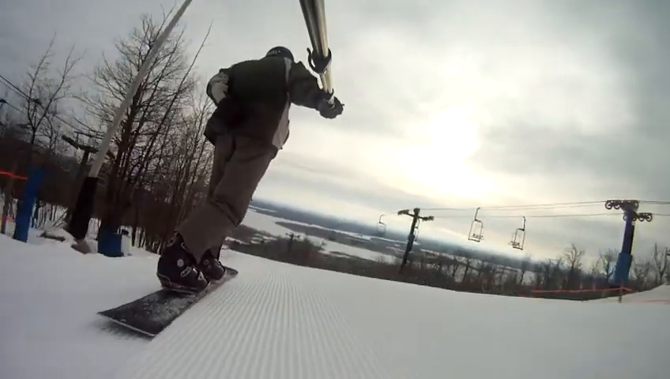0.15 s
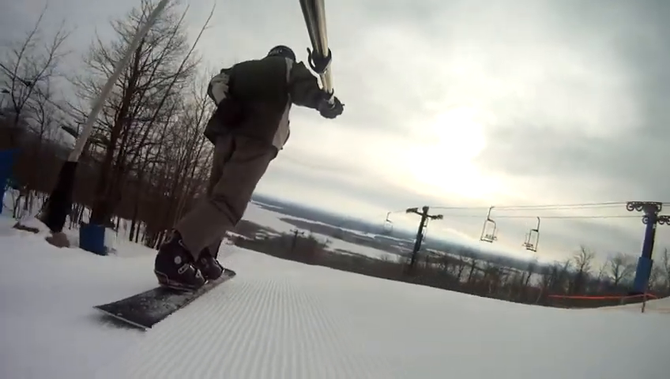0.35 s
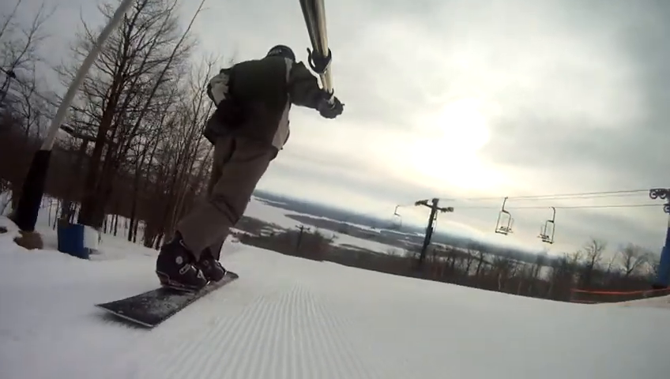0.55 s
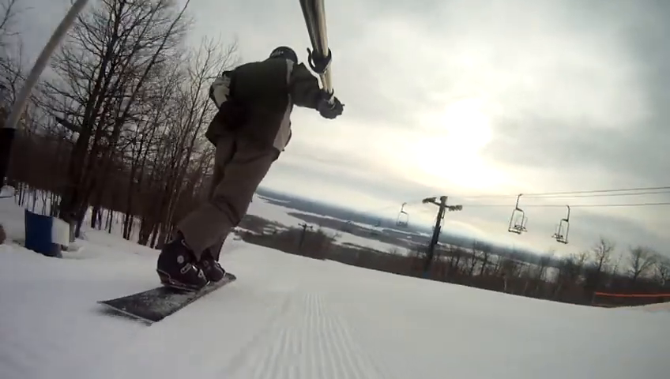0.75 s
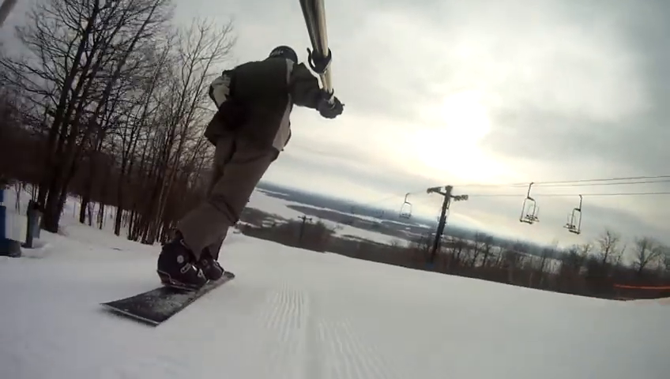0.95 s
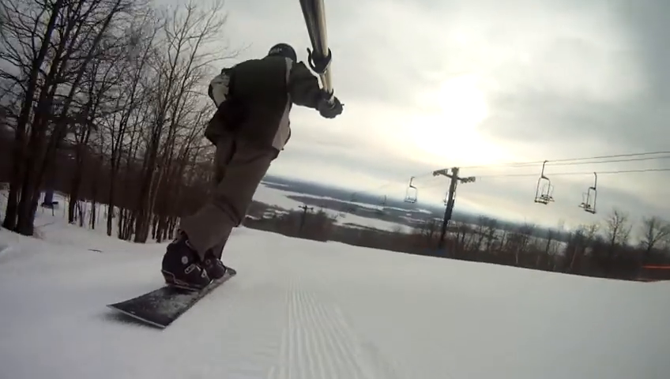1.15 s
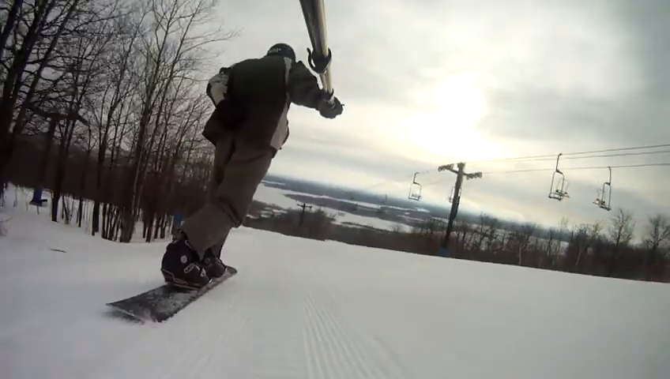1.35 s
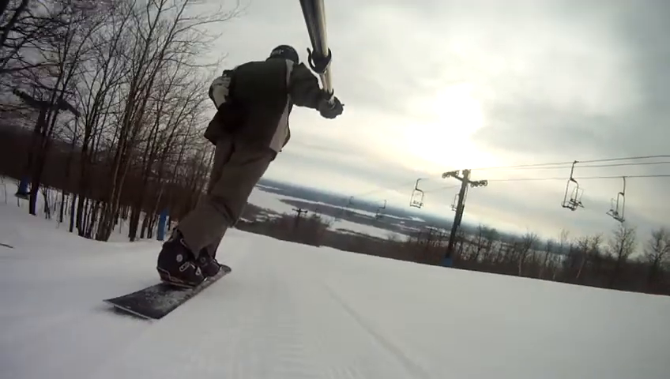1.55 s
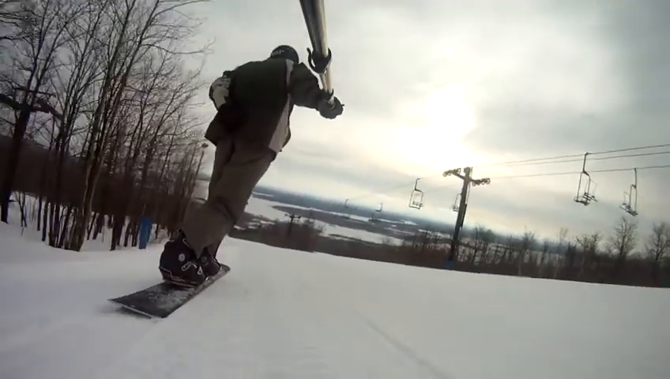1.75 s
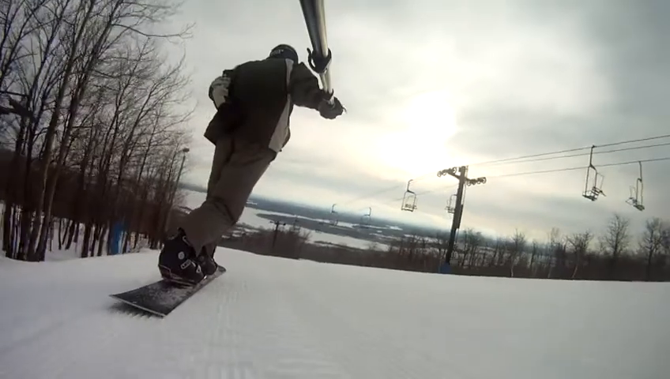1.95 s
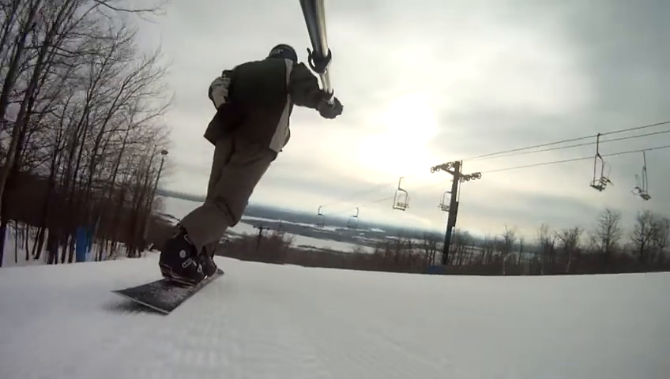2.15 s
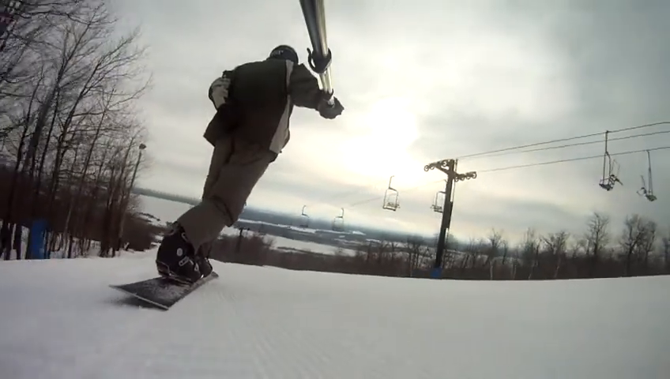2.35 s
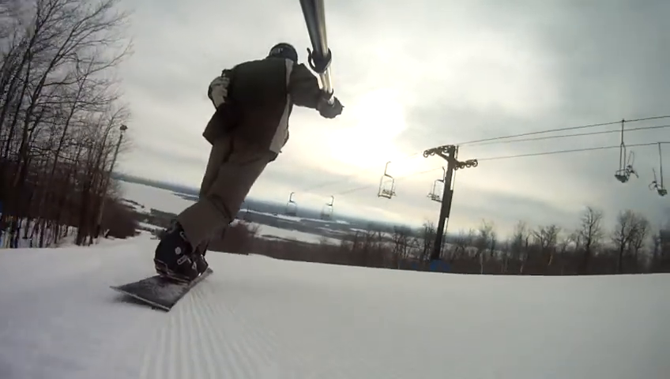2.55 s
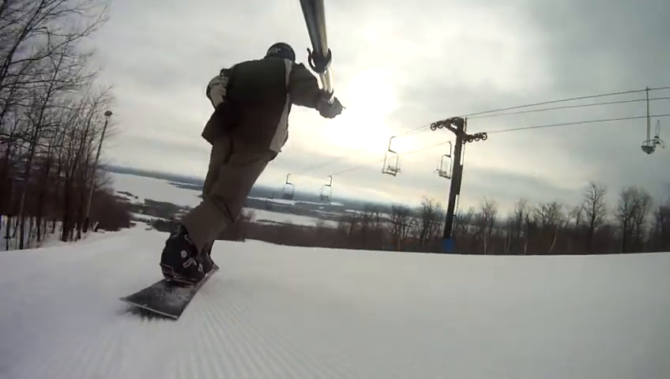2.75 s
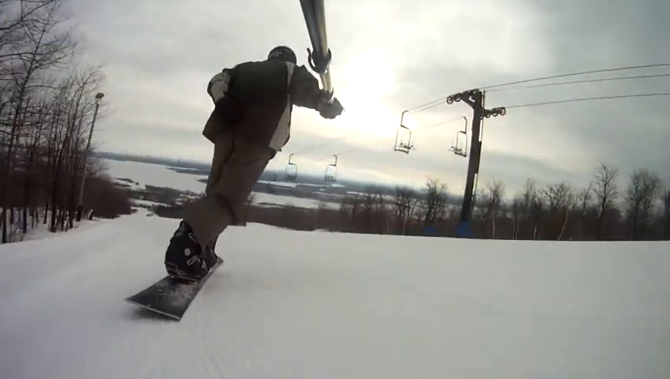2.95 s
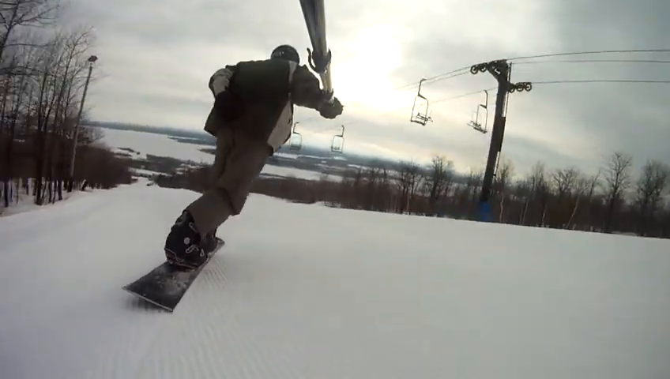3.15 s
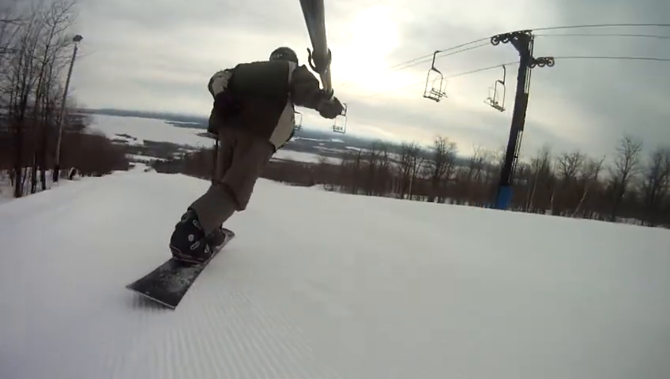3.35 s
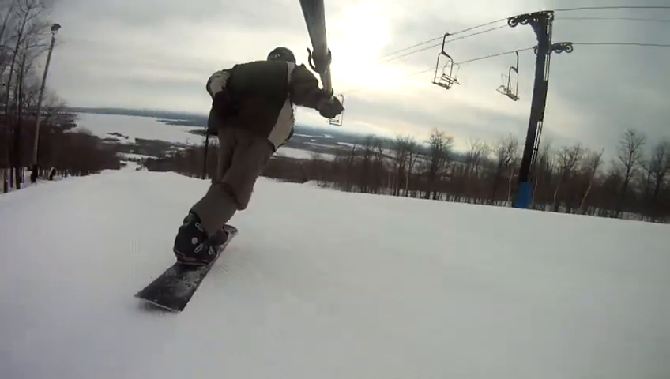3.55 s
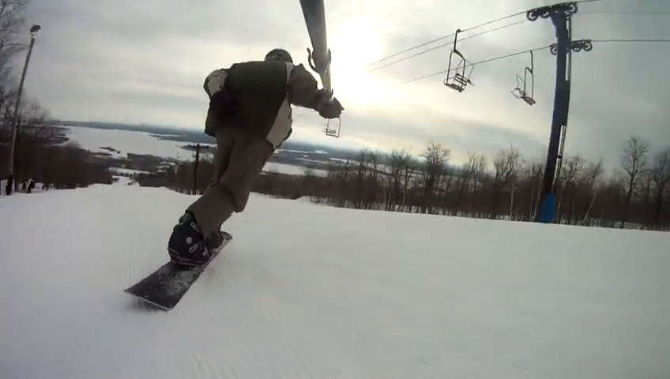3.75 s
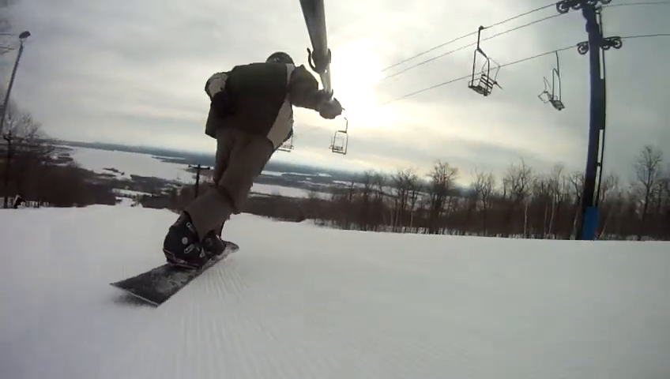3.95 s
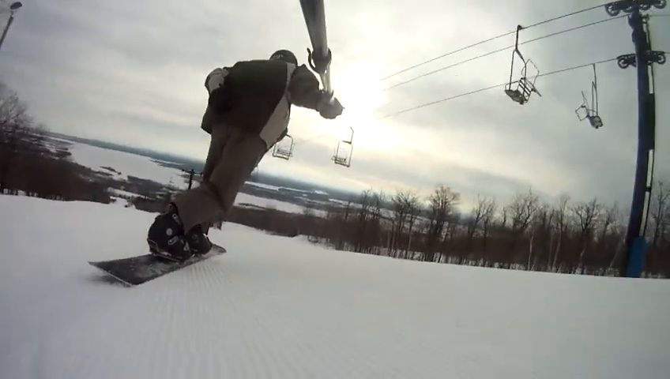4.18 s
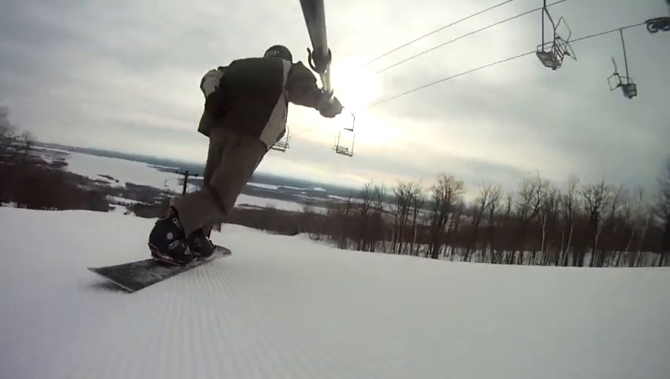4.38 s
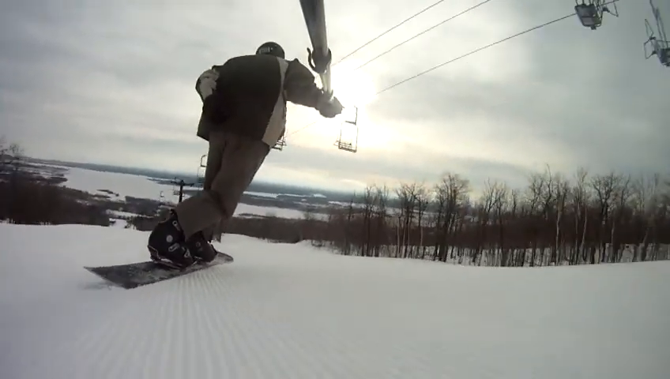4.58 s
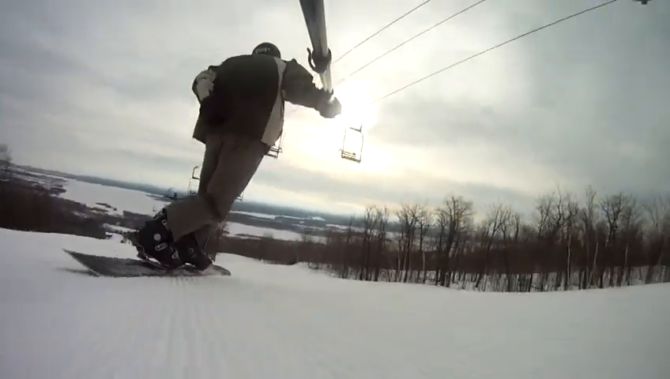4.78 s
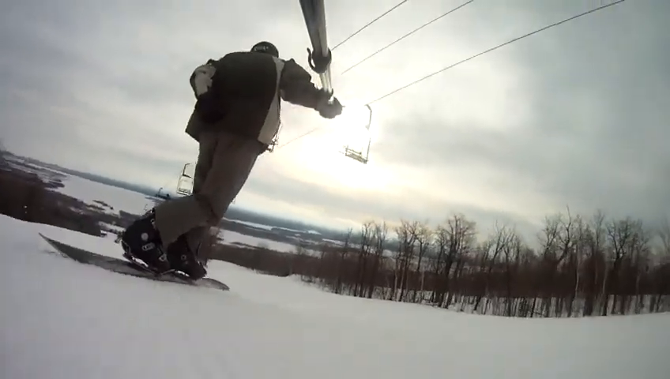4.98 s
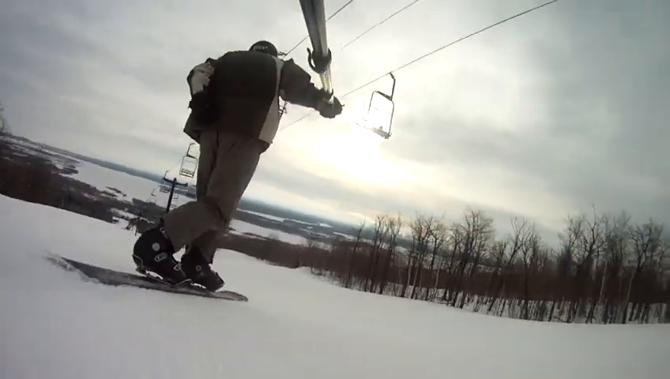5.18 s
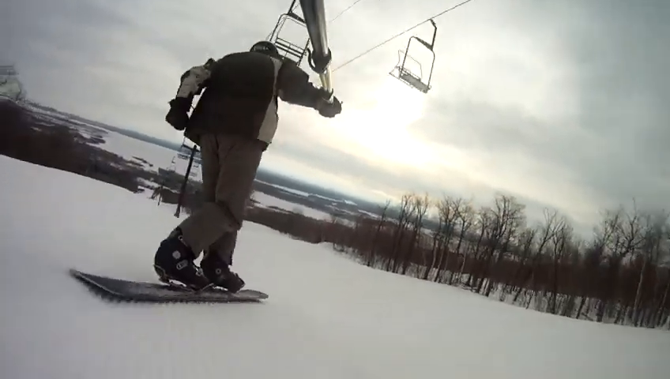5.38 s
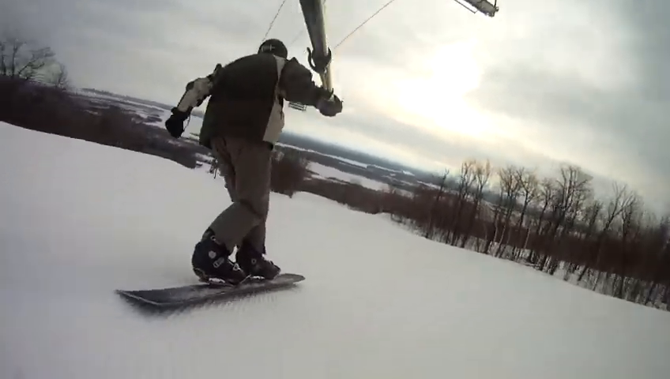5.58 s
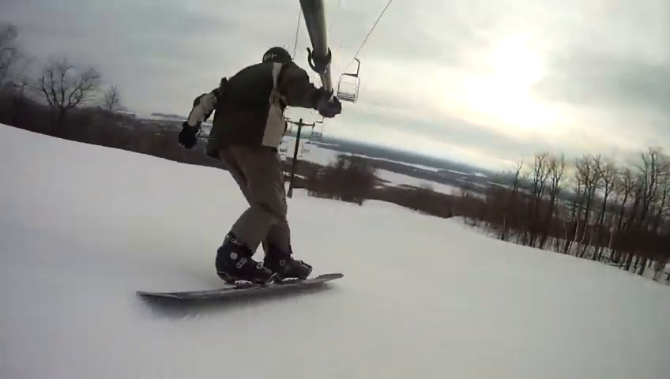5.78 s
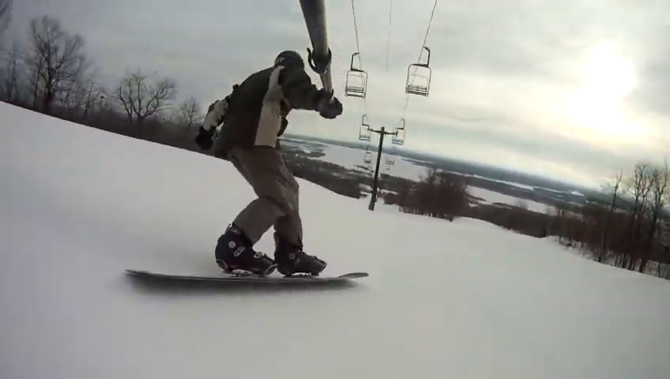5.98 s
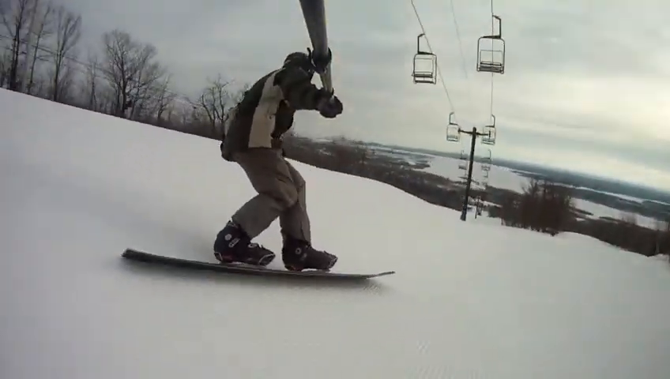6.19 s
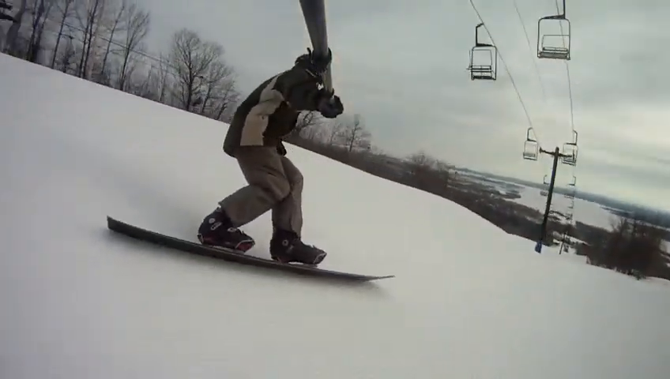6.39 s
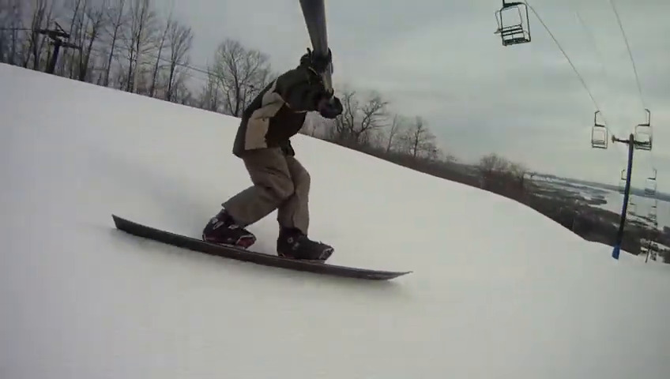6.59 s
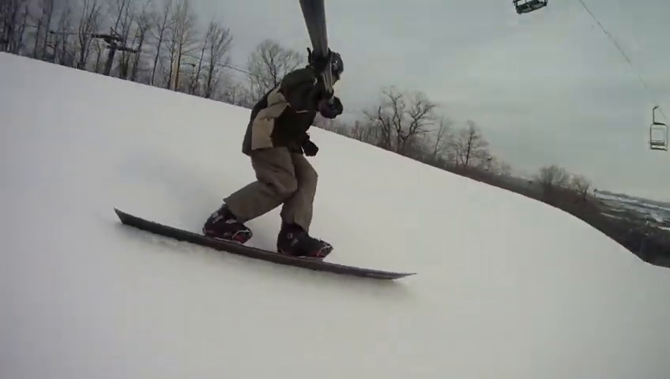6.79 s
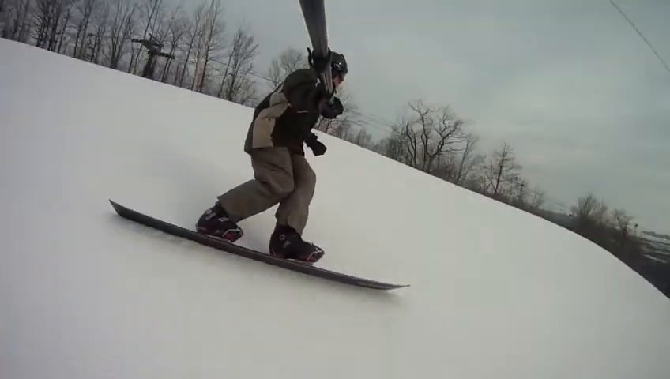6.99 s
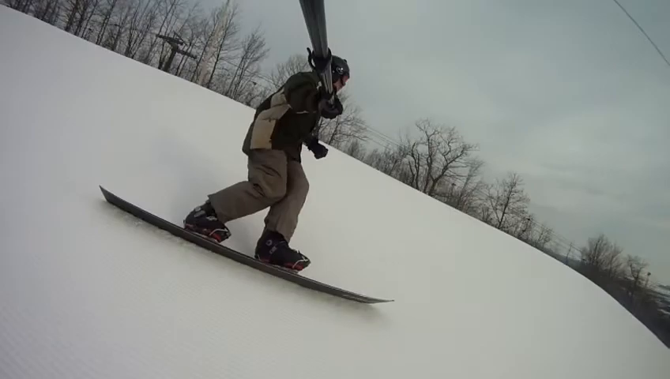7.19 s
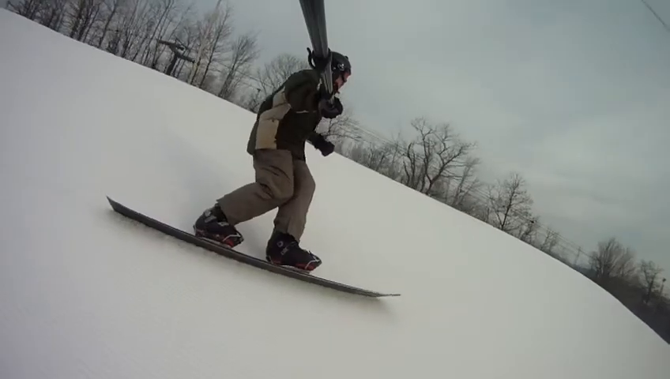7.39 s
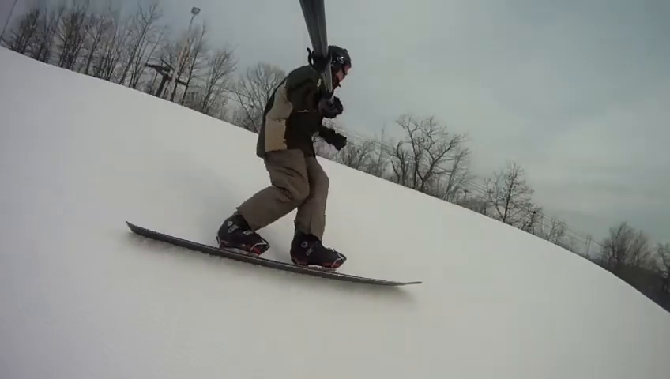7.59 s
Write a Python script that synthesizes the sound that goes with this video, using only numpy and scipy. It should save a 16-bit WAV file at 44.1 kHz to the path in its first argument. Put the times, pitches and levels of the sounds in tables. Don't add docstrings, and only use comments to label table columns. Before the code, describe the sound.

Close, boxy, slightly distorted sound of a snowboard ride. Hissing snow and light wind rumble build into a loud, fluttering roar with boomy gusts and blunt pops that make the level dip. The edge grates unevenly through packed snow, throwing fine grainy spray. The turn eases briefly into a flatter hiss, then a coarse, choppy carve finishes the ride and stops abruptly, with no open-air echo.

```python
import sys
import numpy as np
from scipy import signal
from scipy.fft import rfft, irfft, next_fast_len
from scipy.io import wavfile
from scipy.ndimage import uniform_filter1d

SR = 44100
rng = np.random.default_rng(int(sys.argv[2]) if len(sys.argv) > 2 else 0)


def rack_gain(trim_db):
    fader = np.asarray(trim_db, float)
    return 10 ** (fader / 20)


def digitize_waveform(pressure):
    field = np.atleast_2d(pressure).T
    bounded = np.clip(field, -1, 1)
    quanta = np.round(bounded * 32767).astype(np.int16)
    wavfile.write(sys.argv[1], SR, quanta)


N = 336483

EDGE_CHANGE_S, EDGE_CHANGE_MS = 5.86, 840
BOOMY_S, BOOMY_MS = 3.57, 600


def rms_one(x):
    return x / np.sqrt(np.mean(x ** 2) + 1e-20)


def in_time(rows):
    s, *columns = np.transpose(rows)
    return [np.interp(np.arange(N) / SR, s, c) for c in columns]


def swells(rows):
    t = np.arange(0, N, 20) / SR
    total_db = np.zeros(len(t))
    for s, db, length_ms in rows:
        u = (t - s) / (length_ms / 1000)
        total_db += db * np.exp(-4 * np.log(2) * u ** 2)
    return np.interp(np.arange(N) / SR, t, total_db)


def coloured(x, spectrum):
    size = next_fast_len(N)
    hz, level_db = np.transpose(spectrum)
    grid = np.maximum(np.arange(size // 2 + 1) * SR / size, 1)
    gain = rack_gain(np.interp(np.log(grid), np.log(hz), level_db))
    return rms_one(irfft(rfft(x, size) * gain, size)[:N])


def drift(rate_hz):
    r = np.exp(-40 * np.pi * rate_hz / SR)
    noise = rng.standard_normal(N // 20 + 2002)
    slow = signal.lfilter([1], [1, -2 * r, r * r], noise)[2000:]
    return np.interp(np.arange(N) / 20, np.arange(len(slow)), rms_one(slow))


def evened(x, window_s):
    window = int(window_s * SR)
    power = uniform_filter1d(uniform_filter1d(x ** 2, window), window)
    return rms_one(x / (power + .05) ** 0.31)


def resonance(x, hz, width_hz):
    r = np.exp(-np.pi * width_hz / SR)
    poles = [1, -2 * r * np.cos(2 * np.pi * hz / SR), r * r]
    return signal.lfilter(np.array([1, 0, -1]) * (1 - r * r) / 2, poles, x)


def crystals(per_s, spread_db):
    sizes = rack_gain(spread_db * np.minimum(rng.exponential(1, N), 5)) * rng.choice([-1, 1], N)
    return sizes * (rng.random(N) < per_s / SR)


# (frequency [Hz], density [dB])
BASE_SPECTRUM = [(900, -19), (1500, -3.5), (2000, 0.5), (2500, 0), (3200, -32), (4300, -17), (4800, -3),
                 (5500, -18)]
# (time [s], swell [dB], length [ms])
SWISHES = [
    (0.0, 4, 120),
    (.45, 4, 100),
]
# (time [s], swell or lull [dB], length [ms])
BUMPS = [(0.404, 2.6, 46), (0.768, 5.5, 59), (1.152, -2.5, 190), (1.482, 4, 49), (2.609, 0.5, 40),
         (2.789, -5.5, 58), (3.028, -4.5, 74), (3.198, -5, 40), (3.372, -3.5, 35), (3.612, 2.7, 26),
         (3.841, 3, 36), (3.981, 1.5, 40), (4.141, -5.5, 87), (4.25, -3.0, 72), (4.864, 3.5, 82),
         (5.049, -3, 33), (5.393, 2.5, 52), (5.787, -5, 47), (5.946, -4.5, 50), (6.071, -3.5, 54),
         (6.346, -3.5, 67), (6.505, -8, 23), (6.605, -4, 85), (6.785, -4, 54), (7.024, 4.5, 52),
         (7.149, -4, 53), (7.313, -1.5, 59), (7.378, 1.5, 23), (7.488, 2.5, 59), (7.618, -5.5, 51)]


def glide():
    t = np.arange(N) / SR
    turn_s, fade_db_per_s, sag_db_per_s = 2.4, 30, 0.2
    straight_db = -54 - sag_db_per_s * t + swells(SWISHES)
    straight_db = straight_db - fade_db_per_s * np.clip(t - turn_s, 0, 2)
    flat = rack_gain(-41.5 + swells(BUMPS)) * swells([(EDGE_CHANGE_S, 1, EDGE_CHANGE_MS)])
    hiss = coloured(crystals(per_s=6300, spread_db=2.0), BASE_SPECTRUM)
    return hiss * (rack_gain(straight_db) + flat) * rack_gain(1.1 * drift(25))


# (frequency [Hz], density [dB])
SPRAY_SPECTRUM = [(1500, -27), (2400, -4), (3400, -8.5), (4200, -3.5), (4800, -5), (5400, -6.5), (6000, -9)]
# (time [s], swell or lull [dB], length [ms])
PLUMES = [(.04, 9, 50), (.39, 4, 40), (.94, 7, 40), (1.42, -5, 40), (2.47, 5, 60), (2.95, -3, 120),
          (3.6, 1, 60), (3.89, -5, 40), (4.07, 3, 50), (4.94, -3, 70), (5.23, 3.5, 53), (5.72, 3.5, 55),
          (6.2, 0.5, 330), (6.55, 8, 35), (6.72, 2, 60), (7.47, -1, 80)]


def spray(chatter_db, speed_db, bite_db):
    spray_db = -38 + 1.07 * speed_db + 0.048 * bite_db + 1.23 * swells(BUMPS) + swells(PLUMES)
    heel_s, heel_drop_db, return_s = 6.485, 18, 0.64
    after_s = np.arange(N) / SR - heel_s
    spray_db = spray_db - heel_drop_db * (after_s > 0) * np.exp(-np.abs(after_s) / return_s)
    grains = crystals(per_s=6000, spread_db=2.0) * rack_gain(1.14 * chatter_db)
    return coloured(grains, SPRAY_SPECTRUM) * rack_gain(spray_db)


# (frequency [Hz], density [dB])
SCRAPE_SPECTRUM = [(350, -32), (650, -4), (1000, -7), (1500, -12.5), (2200, -15.5), (3200, -28),
                   (3900, -28.5), (4500, -41)]
# (frequency [Hz], width [Hz], level [dB])
CAVITY = (431, 254, 3.9)
# (time [s], extra bite [dB], length [ms])
DIGS = [(6.545, 6, 23), (6.71, 3, 88), (6.87, 4.5, 46), (6.95, 2.5, 90), (7.03, 1.5, 67), (7.1, 4.5, 30),
        (7.2, 5.5, 19), (7.27, -1, 60), (7.38, 3, 30), (7.44, 0, 30), (7.51, 2, 44), (7.585, 3.5, 21)]


def scrape(chatter_db, speed_db, bite_db):
    scrape_db = -33.9 + speed_db + bite_db + swells(DIGS) + 0.88 * swells(BUMPS)
    grit = crystals(per_s=5000, spread_db=1.5) * rack_gain(chatter_db)
    hz, width_hz, cavity_db = CAVITY
    ring = rms_one(resonance(resonance(grit, hz, width_hz), hz, width_hz))
    return (coloured(grit, SCRAPE_SPECTRUM) + rack_gain(cavity_db) * ring) * rack_gain(scrape_db)


# (time [s], wind on the case [dB], speed over the snow [dB], bite of the edge [dB])
RIDE = [(0, -22, -17.5, -0.5), (.15, -15, -16, 0), (.9, -14, -18, 2), (1.4, -11, -14.5, 2.5),
        (1.9, -6.5, -12.5, 0.5), (2.35, -9.5, -16.5, 4.5), (2.58, -7, -12, 3.5), (2.67, 0, -6, 3),
        (3.1, 1, -1.5, 0), (3.7, 0.5, -.5, 0), (4.2, -1.1, -1.5, 3), (4.9, -2, -4, 1.5),
        (5.7, -1.7, -.5, 0.9), (5.9, -2.5, -1, -2), (6.4, 0, -3.5, 3), (6.7, -8.5, -3, 9),
        (7.1, -2.5, -3, 8), (7.63, 2, -2, 7)]
# (frequency [Hz], width [Hz], level [dB])
PORT = (3696, 300, 1.9)


def edge(eddies_db):
    wind_db, speed_db, bite_db = in_time(RIDE)
    chatter_db = 0.43 * drift(61) + 0.65 * eddies_db
    snow = scrape(chatter_db, speed_db, bite_db) + spray(chatter_db, speed_db, bite_db)
    hz, width_hz, port_db = PORT
    faces_board = np.arange(N) / SR > 6.2
    return snow + rack_gain(port_db + 3 * faces_board) * resonance(snow, hz, width_hz)


# (frequency [Hz], width [Hz], level [dB])
SEAMS = [(1265, 170, 3), (2776, 295, 6), (2983, 310, 2.5)]


def whistle(eddies_db, speed_db, bite_db):
    whistle_db = -36.74 + 1.1 * speed_db - 0.11 * bite_db
    whistle_db = whistle_db + 0.82 * swells(BUMPS) + swells([(EDGE_CHANGE_S, -1.5, EDGE_CHANGE_MS)])
    air = rng.standard_normal(N) * rack_gain(1.05 * eddies_db + 0.24 * drift(75))
    tones = np.zeros(N)
    for hz, width_hz, seam_db in SEAMS:
        pole_hz = 1.54 * width_hz
        tones += rack_gain(seam_db) * resonance(resonance(air, hz, pole_hz), hz, pole_hz)
    return rms_one(tones) * rack_gain(whistle_db)


# (frequency [Hz], density [dB])
BOOM_SPECTRUM = [(70, -17), (130, 1), (200, -2.5), (320, -3.5), (480, -6), (600, -14), (750, -27),
                 (1200, -43.5)]
# (time [s], swell or lull [dB], length [ms])
GUSTS = [(0.11, -4, 67), (0.504, -3.2, 40), (0.639, -3.4, 37), (0.918, -4.5, 118), (1.586, -7, 52),
         (1.686, -3.5, 82), (1.921, -3.5, 65), (2.195, -2, 50), (2.31, -5.5, 67), (2.629, -4.5, 40),
         (2.819, -5.5, 37), (2.973, -6, 22), (3.387, -2, 32), (3.527, 3.5, 46), (4.141, -7, 44),
         (4.375, 7, 17), (4.899, 6, 46), (5.049, -7, 24), (5.183, -2, 30), (5.393, 3.5, 48),
         (6.036, -4.5, 16), (6.231, -14, 23), (6.38, -6, 59), (6.71, 7, 64), (6.894, 2.5, 59),
         (7.333, -3.9, 59), (7.543, -7, 27), (7.618, -16, 44)]


def boom(eddies_db, wind_db, speed_db, bite_db):
    turns = [(EDGE_CHANGE_S, -3, 500.), (BOOMY_S, 1.5, BOOMY_MS)]
    boom_db = -18.59 + 0.49 * wind_db + 0.44 * speed_db + 0.43 * bite_db + swells(GUSTS + turns)
    boom_db = boom_db + 0.54 * eddies_db + 1.0 * drift(26)
    return evened(coloured(rng.standard_normal(N), BOOM_SPECTRUM), window_s=0.04) * rack_gain(boom_db)


# (frequency [Hz], density [dB])
BUFFET_SPECTRUM = [(12, -30), (28, 3), (45, 1), (90, 2.5), (140, -5.5), (220, -8), (400, -49.5)]
# (time [s], swell or lull [dB], length [ms])
SHOVES = [(0.07, -9, 46), (0.17, -9, 29), (0.668, -7.5, 32), (0.808, 6.5, 41), (1.013, -7.6, 44),
          (1.088, 4.5, 23), (1.227, -6, 59), (1.512, -7, 66), (1.786, 2.5, 49), (1.946, -9, 34),
          (2.18, -8.3, 35), (2.948, 0, 45), (3.018, -15, 63), (3.317, -11, 40), (3.467, -10, 47),
          (4.185, -4, 34), (4.689, -5, 40), (4.899, 4, 27), (5.348, -2, 36), (5.552, -13, 40),
          (5.737, 7, 43), (5.792, -3, 30), (5.976, -1, 20), (6.121, -9, 35), (6.435, -6.1, 32),
          (6.735, 11, 44), (7.069, -5, 40), (7.353, -3.5, 40)]


def buffet(wind_db):
    turns = [(EDGE_CHANGE_S, 1.5, EDGE_CHANGE_MS), (BOOMY_S, -2.5, BOOMY_MS)]
    buffet_db = -16.5 + wind_db + swells(SHOVES + turns) + 1.2 * drift(19)
    return evened(coloured(rng.standard_normal(N), BUFFET_SPECTRUM), window_s=0.1) * rack_gain(buffet_db)


def wind(eddies_db, free):
    wind_db, speed_db, bite_db = in_time(RIDE)
    lows = buffet(wind_db) + boom(eddies_db, wind_db, speed_db, bite_db)
    return lows * free + whistle(eddies_db, speed_db, bite_db)


# (time [s], signed height [full scale], width [ms], gain duck [dB])
SLAPS = [(0.822, 0.25, 4.3, 0.3), (1.083, -0.19, 2.4, 0.3), (1.365, -0.19, 2.3, 0.3),
         (1.808, -0.35, 2.2, 0.3), (2.143, 0.29, 2.1, 0.3), (2.419, 0.27, 2.7, 0.3), (2.871, 0.5, 2.8, 3.1),
         (2.944, 0.62, 2.9, 3.3), (3.271, 0.55, 1.6, 3.5), (3.523, 0.6, 1.8, 5.4), (3.85, 0.6, 2.3, 1.6),
         (3.995, 0.54, 1.4, 3.3), (4.063, -0.68, 1.3, 1.3), (4.378, 0.82, 1.9, 2.9),
         (4.487, 0.54, 2.1, 2.8), (4.645, -0.68, 1.6, 1.0), (4.898, -0.6, 2.7, 7.4),
         (5.025, -0.48, 3.9, 2.0), (5.158, 0.46, 4.7, 2.0), (5.396, -0.69, 1.8, 5.2),
         (5.727, 0.57, 2.1, 4.9), (5.874, -0.53, 3.9, 3.9), (6.327, 0.61, 1.9, 1.3),
         (6.479, -0.72, 2.9, 1.4), (6.726, 0.64, 0.9, 2.2), (6.858, 0.67, 0.9, 1.0),
         (7.219, 0.51, 1.3, 6.6), (7.409, 0.64, 1.4, 5.2), (7.505, -0.49, 1.6, 4.0),
         (7.583, 0.67, 1.5, 4.9)]


def slaps():
    push, free, t = np.zeros(N), np.ones(N), np.arange(N) / SR
    for s, height, width_ms, duck_db in SLAPS:
        near = slice(int((s - .02) * SR), int((s + .02) * SR))
        u = (t[near] - s) / (width_ms * 0.00052)
        push[near] += .95 * height * (1 - .5 * u ** 2) * np.exp(-u ** 2 / 2)
        free[near] *= 1 - .9 * np.exp(-u ** 2 / 6)
    return push, free


def ducking():
    recovery_s, attack_s = 0.043, 0.00089
    kicks = np.zeros(N)
    for s, height, width_ms, duck_db in SLAPS:
        kicks[int((s + width_ms * 6e-4) * SR)] = -duck_db
    back, fall = np.exp(-1 / (recovery_s * SR)), np.exp(-1 / (attack_s * SR))
    recovering = signal.lfilter([1], [1, -back], kicks)
    return signal.lfilter([1 - fall], [1, -fall], recovering)


def scene():
    eddies_db = 1.26 * drift(31)
    push, free = slaps()
    snow = glide() + edge(eddies_db)
    snow_lows = signal.sosfilt(signal.butter(1, 900, fs=SR, output="sos"), snow)
    steady = snow - (1 - free) * snow_lows + wind(eddies_db, free)
    steady = 0.79 * np.tanh(steady / .8)
    return np.tile(steady * rack_gain(ducking() + 1.33) + push, (2, 1))


def band_limit(x):
    return signal.sosfilt(signal.butter(12, 15480, fs=SR, output="sos"), x)


def record(dry):
    mono = signal.sosfilt(signal.butter(14, 5374, fs=SR, output="sos"), dry[0])
    mono = mono * np.clip((N - np.arange(N)) / (.004 * SR), 0, 1)
    slow = signal.resample_poly(mono, 40, 147, window=("kaiser", 1))
    held = signal.resample_poly(np.repeat(slow, 4), 147, 160)[:N]
    held = np.pad(held, (0, N - len(held)))
    held = signal.sosfilt(signal.ellip(12, .3, 70, 15290, fs=SR, output="sos"), held)
    band = signal.butter(2, [900, 9000], "band", fs=SR, output="sos")
    bright = held + 1.14 * signal.sosfilt(band, held)
    difference = bright * drift(41) * rack_gain(-41.0 + 8.4 * drift(4.5))
    mix = held + difference * [[1], [-1]]
    return band_limit(mix)


dry = scene()
out = record(dry)
digitize_waveform(out)
```